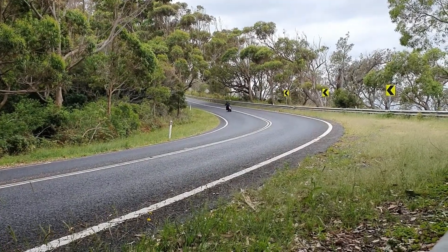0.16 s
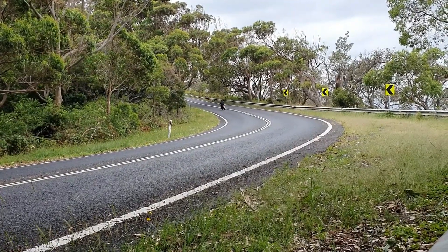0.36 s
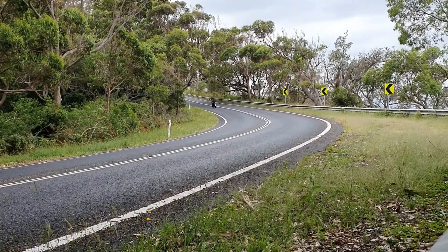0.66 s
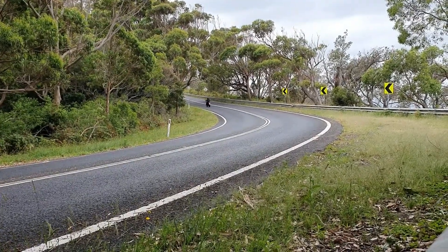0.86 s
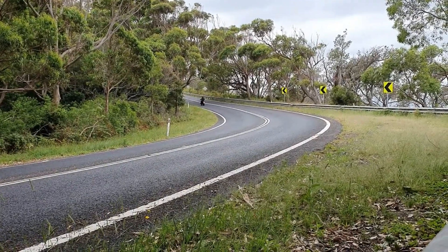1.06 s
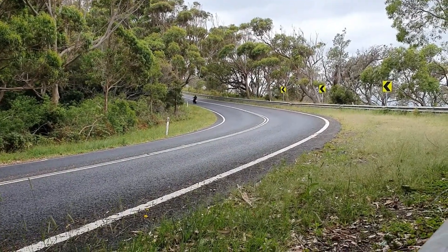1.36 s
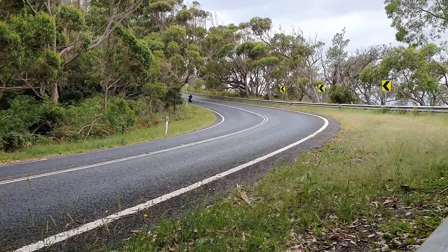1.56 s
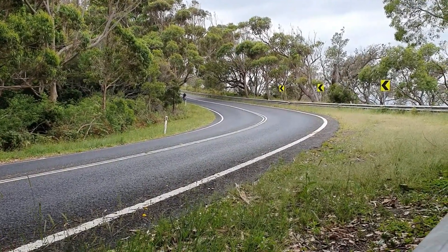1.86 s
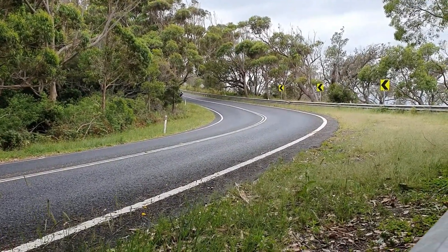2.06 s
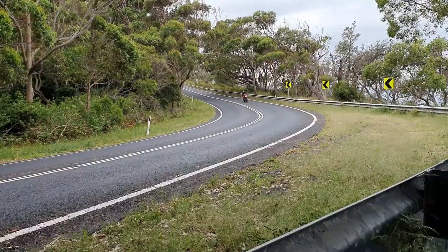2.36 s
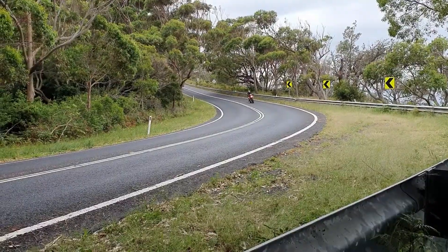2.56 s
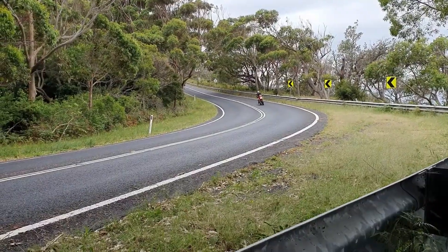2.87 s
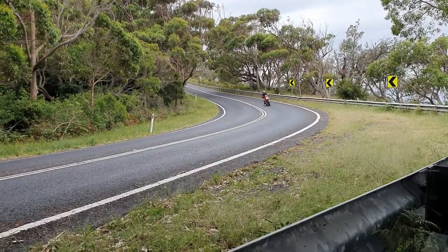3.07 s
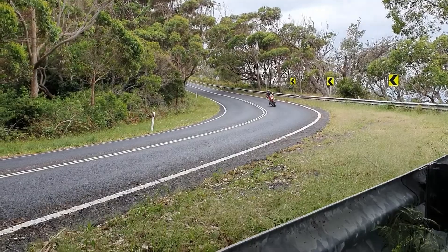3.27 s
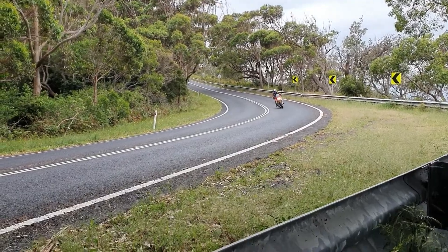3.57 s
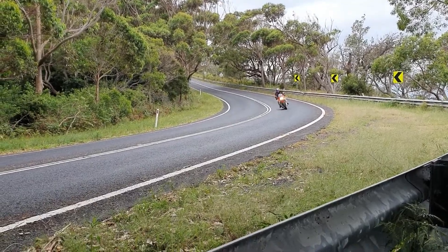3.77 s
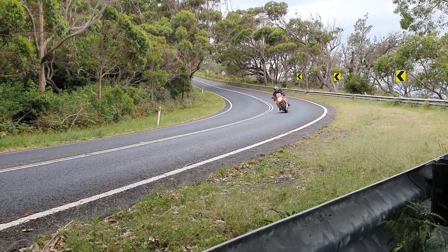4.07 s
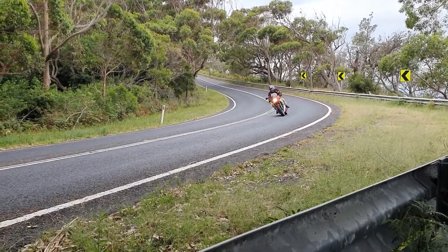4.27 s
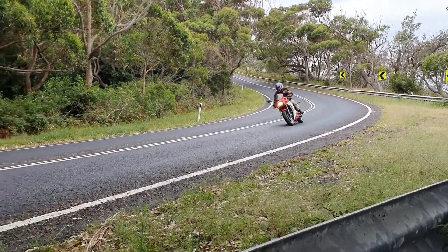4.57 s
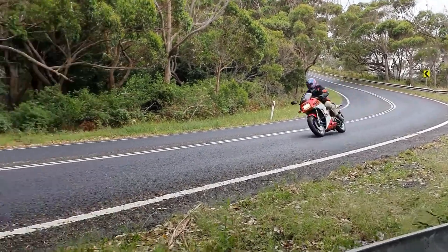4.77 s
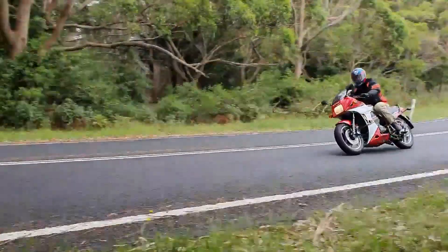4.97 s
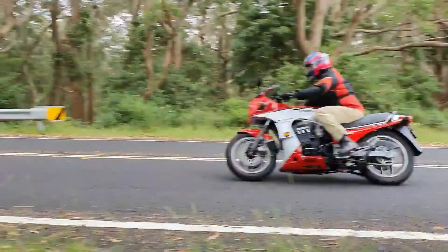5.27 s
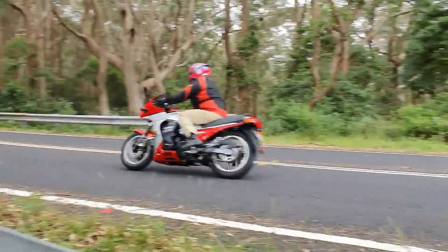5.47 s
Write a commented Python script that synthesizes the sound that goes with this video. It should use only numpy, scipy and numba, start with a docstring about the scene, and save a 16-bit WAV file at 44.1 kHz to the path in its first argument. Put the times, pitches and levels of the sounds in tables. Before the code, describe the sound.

Stationary stereo microphone beside a forest bend. First a departing motorcycle's buzzing drone thins out behind a nearby slow, throbbing idle. At a hard cut, clattering knocks and rasp give way to a low engine pulling away to the left. A smooth four-cylinder note grows, opens slightly, then bursts past with rasp, chain sizzle and tyre hiss, sinking in pitch. Leaves rustle softly throughout.

```python
"""Motorcycles on a forest bend

Two scenes, heard from the verge. First a twin idles nearby while a four fades up the road.
Then an unseen engine rattles and pulls away on the left, and a four comes round the bend, opens the
throttle slightly and passes close, its pitch sinking, chain and tyres hissing. Leaves and air stir throughout.
Engines are sums of locked orders; gas, tyres and leaves are coloured noise; metal is resonant filters."""
import sys
import numpy as np
from scipy import signal
from scipy.fft import rfft, irfft, next_fast_len
from scipy.io import wavfile
from scipy.ndimage import map_coordinates
from numba import njit

SR = 44100
rng = np.random.default_rng(int(sys.argv[2]) if len(sys.argv) > 2 else 0)


def bounce(signal):
    """Save signal as a 16-bit WAV file at the path given by the first command-line argument."""
    frames = np.transpose(np.atleast_2d(signal))
    limited = np.clip(frames, -1, 1)
    pcm = np.round(limited * 32767).astype(np.int16)
    wavfile.write(sys.argv[1], SR, pcm)


N = 248283
T = np.arange(N) / SR

CUT_S = 2.211  # second scene replaces the first
PASSES_S = 5.35  # passing bike is alongside
PIPE_SMEAR = 1.57  # engine order above which its pipes spread the pulses into a fine buzz


def passing_bike():
    """Exhaust boom leads; the intake faces forward; tailpipe, silencer rasp and chain peak near the pass."""
    # cycle_multiple, level_db (relative); cycle = four-stroke cycle
    exhaust_orders = [(3, -11.5), (4, 11), (6, -27), (7, -34)]
    intake_orders = [(10, -4), (11, 0.5), (12, -0.5), (14, -13), (15, -20), (16, -5.5), (17, -12),
                     (20, -21), (22, -17), (34, -19), (36, -21), (38, -20), (50, -21), (51, -21), (52, -22)]
    bark_orders = [(8, 2), (10, -11), (12, -4), (14, -14), (15, -15), (16, -5), (18, -13), (20, -20),
                   (24, -15), (32, -21), (36, -17), (40, -14), (44, -18), (48, -20), (52, -15)]
    # noise colours: freq_hz, density_db_per_hz (relative)
    tyre_colour = [(80, 6), (270, -1.5), (450, 1.5), (700, -6), (850, -3.5), (1200, -9), (1600, -7),
                   (2100, -8), (3200, -9), (5000, -16), (8000, -29), (15000, -35)]
    chain_colour = [(1500, -20), (3000, -8.5), (4500, -1.5), (6000, -0.5), (7500, -4), (10000, -2.5),
                    (12500, -3.5), (15000, -7)]
    # silencer resonances: approach_hz, width_hz, level_db (relative)
    silencer_modes = [(1120, 170, -3), (1236, 170, -0.5), (1590, 91, -2), (1950, 120, -11)]
    # ringing metal parts, each beamed past briefly: approach_hz, width_hz, loudest_s, reach_s, level_db
    metal_modes = [(2650, 21, 5.36, 0.08, -32.5), (3210, 40, 5.5, 0.06, -39.5), (3388, 40, 5.4, 0.078, -32),
                   (3720, 69, 5.45, 0.13, -39), (3500, 93, 4.7, 0.061, -43), (4010, 60, 5.215, 0.047, -35),
                   (4210, 130, 5.19, 0.078, -34.5), (4800, 40, 5.26, 0.11, -36.5),
                   (4770, 170, 5.04, 0.12, -40.5), (5320, 80, 4.97, 0.1, -41),
                   (5360, 140, 5.25, 0.051, -37.5), (5900, 260, 5.27, 0.055, -40),
                   (6500, 350, 5.3, 0.055, -40)]
    speed_m_s, closest_m, sound_m_s = 18, 4, 343
    coast_hz, throttle_rise_hz = 115.74, 3.05  # firing rate at the source, rise on the throttle
    far_lag_ms, near_lag_ms = 0.087, 0.21  # lag of the left ear
    pan_db = -1.7  # left minus right

    along_m = speed_m_s * (T - PASSES_S)
    distance_m = np.hypot(along_m, closest_m)
    doppler = 1 / (1 + speed_m_s / sound_m_s * along_m / distance_m)
    throttle = ramp(3.62, 0.65)  # rolled on out of the bend
    firing_hz = (coast_hz + throttle_rise_hz * throttle) * doppler
    lag_ms = far_lag_ms + (near_lag_ms - far_lag_ms) * closest_m / distance_m
    cycle = turns(firing_hz) / 4

    boom = engine(cycle, exhaust_orders, rough=0.045, rate=65, waver_db=0.45)
    intake = engine(cycle, intake_orders, rough=0.045, rate=90, waver_db=1.5, smear=PIPE_SMEAR)
    bark = engine(cycle, bark_orders, rough=0.1, rate=110, waver_db=1.0, smear=PIPE_SMEAR)
    note = undb(beam("boom", throttle)) * boom
    note = note + undb(beam("intake", throttle)) * intake
    note = note + undb(beam("bark", throttle)) * bark

    gas = puffs(cycle, depth=0.067) * puffs(turns(firing_hz), depth=0.17)
    tyres_db = beam("tyres", throttle) + .5 * walk(15)
    tyres = undb(tyres_db) * wash(tyre_colour, 0.84 * lag_ms, pan_db, diffuse_db=-4) * gas
    chain_db = beam("chain", throttle) + 0.77 * walk(17)
    chain = undb(chain_db) * wash(chain_colour, lag_ms, pan_db, diffuse_db=13)

    # resonances sink in pitch with Doppler
    sink = doppler / doppler.max()
    silencer = 0
    for hz, width_hz, db in silencer_modes:
        mode = unit(ring(rng.standard_normal(N) * gas, hz * sink, float(width_hz)))
        silencer = silencer + undb(db) * mode
    rasp = undb(beam("rasp", throttle)) * unit(silencer)
    metal = 0
    for hz, width_hz, s, reach_s, db in metal_modes:
        mode = unit(ring(rng.standard_normal(N) * gas, hz * sink, float(width_hz)))
        chatter_db = 1.7 * walk(90)
        metal = metal + undb(db + chatter_db + falloff(s, reach_s, fall_db=12.5)) * mode

    direct = place(note + rasp, lag_ms, 0) + place(metal, 0.23, -0.95)
    scattered = undb(-12.5) * trees(note + rasp) + undb(-3.5) * trees(metal)
    return direct + scattered + tyres + chain


def beam(part, throttle):
    """Level in dB of one part of the passing bike, beamed along the road."""
    # part: peak_db, lead_s (before the pass), reach_s, fall_db per doubling, throttle_gain_db
    beams = { "boom": (-11.5, 0, 0.26, 3.5, 3.5), "intake": (-27.5, 0.6, 0.84, 17.5, 0.5),
             "bark": (-21.5, 0.04, 0.2164, 7.5, -5), "rasp": (-29, 0.01, 0.1139, 6.5, 2),
             "tyres": (-26, 0.11, 0.39, 7, -1.5), "chain": (-32, 0.02, 0.3657, 12.5, -8), }
    db, lead_s, reach_s, fall_db, throttle_db = beams[part]
    return db + falloff(PASSES_S - lead_s, reach_s, fall_db) - throttle_db * (1 - throttle)


def unseen_engine():
    """Rattles and rasps at low speed, then booms on the left as revs and load rise."""
    # growl: firing_multiple, level_db (relative)
    growl_orders = [(3, -1), (4, 1), (5, -4.5), (6, -19)]
    # noise colours: freq_hz, density_db_per_hz (relative)
    rattle_colour = [(25, -23), (60, -4), (110, -1), (150, -13.5), (190, -2), (280, -6.5), (400, -18),
                     (570, -14.5), (900, -15.5), (1300, -14), (2200, -36.5), (3100, -50), (6500, -46),
                     (15000, -57)]
    rolling_colour = [(50, -16), (110, 2), (250, -4), (450, -8.5), (750, -12), (1050, -9.5), (1400, -22.5),
                      (2600, -23.5), (3800, -32.5), (6000, -38.5), (9000, -42.5), (15000, -54)]
    # centre of the rasping resonance: time_s, centre_hz
    rasp_centre = [(2.22, 1300), (2.32, 1680), (2.42, 1750), (2.6, 1770), (2.68, 1600), (2.8, 1540)]
    pull_s = 2.62  # starts to pull away
    idle_hz, rev_rise_hz, rev_lag_s, climb_hz_per_s = 35.1, 25.83, .27, 2.6  # firing rate: jump, then creep

    pulling_s = np.maximum(T - pull_s, 0)
    load = ramp(pull_s + 0.085, 0.074)  # just after the throttle
    rev_jump_hz = rev_rise_hz * (1 - np.exp(-pulling_s / rev_lag_s))
    phase = turns(idle_hz + rev_jump_hz + climb_hz_per_s * pulling_s)

    boom_db = -37 + load * (14.5 + falloff(2.84, reach_s=0.52, fall_db=6.5)) - 8 * ramp(4.9, 0.5)
    # octave and growl levels are relative to the boom; the octave dies away sooner
    octave_db = -4.5 - 14 * ramp(3.1, 0.43)
    boom = engine(phase, [(1, 0)], rough=0.031, rate=28, waver_db=0.1)
    # order 1.8 sounds as 2; its own value sets timing jitter and smear
    octave = undb(octave_db) * engine(phase, [(1.8, 0)], rough=0.11, rate=33, waver_db=3)
    growl = undb(-10.0) * engine(phase, growl_orders, rough=0.6, rate=45, waver_db=0.5)
    note = undb(boom_db) * (boom + octave + growl)

    rattle_db = -22.5 - 34 * pulling_s  # dies as it pulls
    rattle = undb(rattle_db) * wash(rattle_colour, -0.454, 0.33, diffuse_db=-9.0) * puffs(phase, depth=0.14)
    rolling_db = -33 + 4 * load - 2 * pulling_s + 0.61 * walk(9)
    rolling = undb(rolling_db) * wash(rolling_colour, -0.37, 0.19, diffuse_db=-1.5) * puffs(phase, depth=0.046)

    straining = ramp(2.11, 0.19) * (1 - ramp(2.79, .3))
    rasp_colour = [(1100, -12), (1400, 3), (1750, -9), (2200, -9), (3000, -8), (8000, -40)]
    rasp_db = -40.0 + .7 * walk(24.7)
    rasp = undb(rasp_db) * straining * wash(rasp_colour, -0.503, -.5, diffuse_db=-12)
    centre_hz = np.interp(T, *np.transpose(rasp_centre))
    grit = undb(-37.5) * straining * unit(ring(clatter(700, 3), centre_hz, 130.))
    shudder = undb(-28.0) * steady_ring(steady_ring(clatter(900, 1), 255, 120), 255, 110)
    shudder = shudder + undb(-41.5) * steady_ring(clatter(500, 1.5), 530, 230)
    panels = shudder * ramp(2.25, 0.071) * (1 - ramp(2.66, .14)) + grit + knocks()
    return place(note + panels, -0.428, 0.34) + rattle + rasp + rolling


def knocks():
    """Single hard blows on the unseen machine: decaying sines."""
    # start_s, ring_hz, decay_s, level_db
    blows = [(2.242, 130, 0.012, -18), (2.289, 275, 0.01, -19), (2.504, 200, 0.007, -17),
             (2.597, 1760, 0.005, -29), (2.643, 1550, 0.004, -20)]
    out = 0
    for s, hz, decay_s, db in blows:
        since_s = np.maximum(T - s, 0)
        out = out + undb(db) * np.sin(2 * np.pi * hz * since_s) * np.exp(-since_s / decay_s)
    return out


def leaving_bike():
    """A four pulls away up the road: exhaust orders, gear whine, chain sizzle and a fading noise rasp."""
    # exhaust: cycle_multiple, level_db (relative)
    exhaust_orders = [(3, 0), (4, -8), (6, -18), (8, -16), (9, -17), (11, -12.5), (12, -11.5), (13, -15),
                      (19, -25), (20, -25), (23, -25), (28, -19), (32, -20), (34, -21), (36, -24),
                      (40, -20)]
    # gear whine: mesh_multiple, loudest_s, reach_s, fall_db per doubling, level_db
    whine_orders = [(2, 0.05, 0.3, 5, -44), (3, 0.33, 0.39, 15, -50)]
    # rasp: freq_hz, density_db_per_hz (relative)
    rasp_colour = [(250, 7.5), (360, -6), (455, 1.5), (700, -5), (950, -8.5), (1300, -6), (1700, -7.5),
                   (2100, -11), (5000, -19.5), (6500, -21), (8000, -28), (12000, -25.5), (15000, -35)]
    # chain sizzle bands: centre_hz, width_hz, level_db (relative)
    sizzle_bands = [(3400, 250, -1), (6460, 410, -5.5), (9400, 600, -8.5)]

    firing_hz = 153.2 + 4.1 * T
    hidden = ramp(0.48, 0.8)  # behind the bend
    cycle = turns(firing_hz) / 4
    exhaust_db = -28.5 - 11.5 * hidden
    exhaust = undb(exhaust_db) * engine(cycle, exhaust_orders, rough=0.15, rate=60, waver_db=2.0)
    mesh = turns(firing_hz * 3.6)
    whine = 0
    for k, s, reach_s, fall_db, db in whine_orders:
        tone = engine(mesh, [(k, 0)], rough=0.3, rate=50, waver_db=1.3)
        whine = whine + undb(db + falloff(s, reach_s, fall_db)) * tone
    rasp_db = -34 - 9.5 * T + walk(11.8)
    rasp = undb(rasp_db) * wash(rasp_colour, 0.015, 0.14, diffuse_db=-7.5) * puffs(cycle, depth=0.18)
    sizzle = np.zeros((2, N))
    for side in range(2):
        for hz, width_hz, db in sizzle_bands:
            sizzle[side] += undb(db) * steady_ring(rng.standard_normal(N), hz, width_hz)
    sizzle = undb(-50) * swell(0.52, 0.36) * sizzle
    note = exhaust + whine
    return place(note, 0.022, .8) + undb(-12) * trees(note) + rasp + sizzle


def idling_twin():
    """A lumpy exhaust beat, with valve gear and gas noise that swell once a cycle."""
    # exhaust: cycle_multiple, level_db (relative)
    exhaust_orders = [(2, -32), (3, -47), (4, -30), (5, 2), (6, -49), (7, -6), (8, -45), (9, -21),
                      (10, -11), (11, -24), (12, -11.5), (14, -17.5), (15, -33), (16, -25.5), (17, -27.5)]
    # valve gear and gas: freq_hz, density_db_per_hz (relative)
    gear_colour = [(30, -2), (60, 1.5), (130, -4), (250, -12.5), (360, -18.5), (460, -15), (650, -19.5),
                   (900, -26), (1200, -22.5), (2000, -25), (3500, -23), (7500, -40.5), (10000, -38),
                   (15000, -53)]
    cycle_hz = 16.75 * (1 + 0.0041 * walk(3.14))
    phase = turns(cycle_hz)
    exhaust = undb(-28) * engine(phase, exhaust_orders, rough=0.064, rate=33, waver_db=1.05, smear=3.493)
    gear = undb(-36.5) * wash(gear_colour, 0.036, 0.051, diffuse_db=0) * puffs(phase, depth=0.14)
    return place(exhaust, .02, 0.91) + gear


def leaves():
    """The wood hisses softly from all sides: mostly scattered noise."""
    # freq_hz, density_db_per_hz (relative)
    leaf_colour = [(900, -19), (1900, -9), (2500, 2), (2900, -9), (3600, 3.5), (4800, -4.5), (6000, -16),
                   (9000, -33)]
    level_db = np.interp(T, [2.1, 2.4], [-45, -47]) + 1.5 * walk(6.01)
    return undb(level_db) * wash(leaf_colour, 0, 0.1, diffuse_db=6.5)


def breeze():
    """Faint low flutter of air, different at each side, and a few soft buffets on both."""
    # buffets: centre_s, length_s, level_db
    buffet_rows = [(0.501, 0.035, -24), (2.124, 0.043, -25)]
    flutter_colour = [(28, -4), (70, 6), (200, -12), (800, -58)]
    flutter = np.array([undb(-43 + 4.0 * walk(4.16)) * noise(flutter_colour) for _ in range(2)])
    buffets = sum(undb(db) * swell(s, length_s / 2) for s, length_s, db in buffet_rows)
    return flutter + buffets * noise([(35, -4), (62, 16), (100, -19), (400, -58)])


def engine(phase, orders, rough, rate, waver_db, smear=6):
    """Locked orders, rms near 1; firings vary in strength and timing, each order wavers through the air."""
    strongest = max(orders, key=lambda row: row[1])[0]
    phase = phase + rough * walk(rate) / (2 * np.pi * strongest) / 2
    tone = 0
    for k, db in orders:
        # the pipe delays high orders more than low ones, which smears each pulse
        angle = 2 * np.pi * round(k) * phase - (k / smear) ** 2
        tone = tone - undb(db + waver_db * walk(7)) * np.cos(angle)
    return unit(tone * (1 + rough * walk(rate)))


def turns(hz):
    """Cycles run so far."""
    return np.cumsum(hz) / SR


def puffs(phase, depth):
    """A swell of gas in the middle of each cycle, rms 1."""
    return unit(np.exp(-depth * np.cos(2 * np.pi * phase)))


@njit
def ring(x, hz, width):
    """State-variable band-pass with a moving centre; hz per sample, width in Hz."""
    y, band, low = np.empty(len(x)), 0., 0.
    for i in range(len(x)):
        g, k = np.tan(np.pi * hz[i] / SR), width / hz[i]
        v = (band + g * (x[i] - low)) / (1 + g * (g + k))
        band = 2 * v - band
        low = low + 2 * g * v
        y[i] = k * v
    return y


def steady_ring(x, hz, width_hz):
    """A resonance at a constant pitch, scaled to rms 1."""
    return unit(ring(x, np.full(N, float(hz)), float(width_hz)))


def clatter(rate, spread_db):
    """Random clicks of very uneven size, on average rate a second."""
    chance = rng.random(N)
    return (chance < rate / SR) * rng.standard_normal(N) * undb(spread_db * rng.standard_normal(N))


def noise(spectrum):
    """Noise of rms 1 with a (Hz, dB) colour; bass rolls off below the first row, last level holds above."""
    hz, db = np.transpose(spectrum)
    size = next_fast_len(N)
    f = np.maximum(np.fft.rfftfreq(size, 1 / SR), 1)
    gain = undb(np.interp(np.log(f), np.log(hz), db)) * np.minimum(f / hz[0], 1) ** 2
    return unit(irfft(rfft(rng.standard_normal(size)) * gain, size)[:N])


def wash(spectrum, lag_ms, pan_db, diffuse_db):
    """Stereo noise, rms near 1: direct part plus scatter unrelated left and right, thinned in the bass."""
    high_pass = signal.butter(2, 560, "high", fs=SR, output="sos")
    scattered = signal.sosfilt(high_pass, [noise(spectrum), noise(spectrum)])
    left, right = unit(place(noise(spectrum), lag_ms, 0) + undb(diffuse_db) * scattered)
    return np.array([left * undb(pan_db / 2), right * undb(-pan_db / 2)])


def place(x, lag_ms, pan_db):
    """Direct sound at two spaced points: left lags by lag_ms and is pan_db louder than right."""
    shift = lag_ms * SR / 2000  # half the lag, samples
    sides = []
    for side in (1, -1):
        moved = map_coordinates(x, [np.arange(N) - side * shift], order=3)
        sides.append(moved * undb(side * pan_db / 2))
    return np.array(sides)


def trees(x, t60_s=0.25, scatter_hz=450):
    """Trunks and leaves scatter all but the bass back, differently to each side: decaying noise tails."""
    t = T[:SR // 2]
    tail = rng.standard_normal((2, len(t))) * undb(-60 * t / t60_s)
    tail /= np.sqrt(np.sum(tail ** 2, axis=1, keepdims=True))
    tail = signal.sosfilt(signal.butter(2, scatter_hz, "high", fs=SR, output="sos"), tail)
    return signal.fftconvolve(x[None], tail, axes=1)[:, :N]


def falloff(s, reach_s, fall_db):
    """Level in dB of a moving source: 0 at time s, nearing fall_db less per doubling of time beyond reach."""
    return -fall_db * np.log2(np.hypot(1, (T - s) / reach_s))


def ramp(s, length_s):
    """A smooth step from 0 to 1, centred on time s."""
    return .5 + .5 * np.sin(np.pi * np.clip((T - s) / length_s, -.5, .5))


def swell(s, spread_s):
    """A bell-shaped rise and fall about time s."""
    return np.exp(-((T - s) / spread_s) ** 2 / 2)


def walk(rate):
    """Random wander of rms 1: straight lines between rate random points a second."""
    steps = rng.standard_normal(4096)
    return unit(np.interp(T * rate, np.arange(len(steps)), steps))


def undb(db):
    """Decibels to gain."""
    return 10 ** (np.asarray(db) / 20)


def unit(x):
    """Scale to rms 1."""
    return x / np.sqrt(np.mean(x ** 2))


def scene():
    """The first scene gives way to the second within 3.5 ms; air and leaves run through both."""
    later = np.clip((T - CUT_S) / 0.0035, 0, 1)
    first = idling_twin() + leaving_bike()
    second = unseen_engine() + passing_bike()
    return (1 - later) * first + later * second + breeze() + leaves()


def record(dry):
    """Drop the deepest rumble below 28 Hz and cut the top steeply above 15.5 kHz."""
    dry = signal.sosfilt(signal.butter(4, 28, "high", fs=SR, output="sos"), dry)
    return signal.sosfilt(signal.ellip(10, .2, 80, 15500, fs=SR, output="sos"), dry)


dry = scene()
out = record(dry)
bounce(out)
```